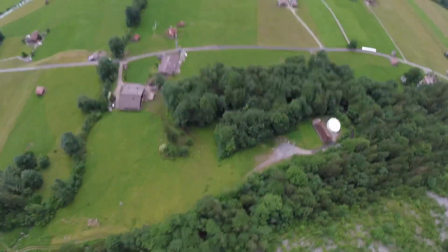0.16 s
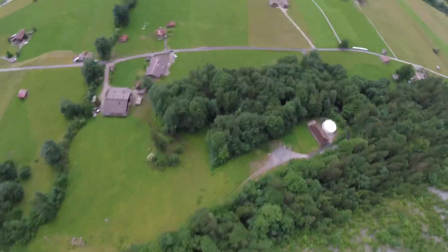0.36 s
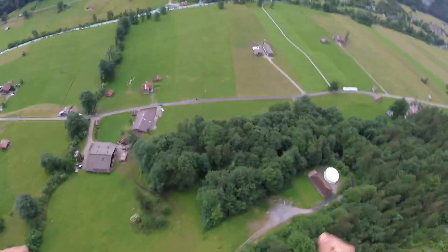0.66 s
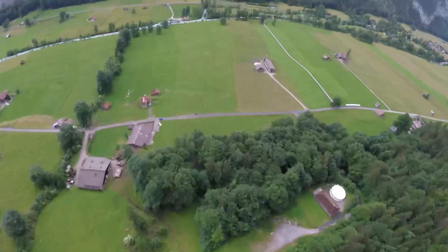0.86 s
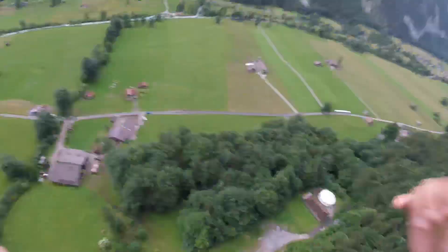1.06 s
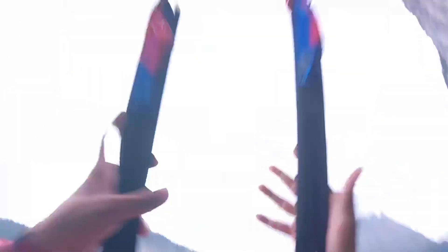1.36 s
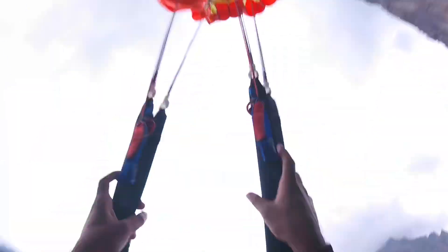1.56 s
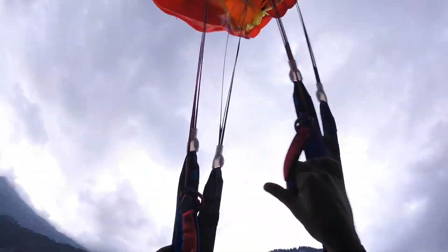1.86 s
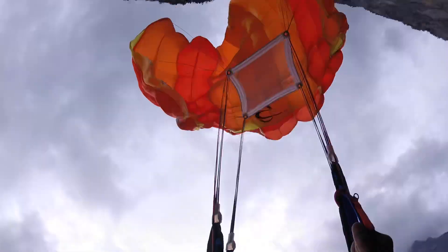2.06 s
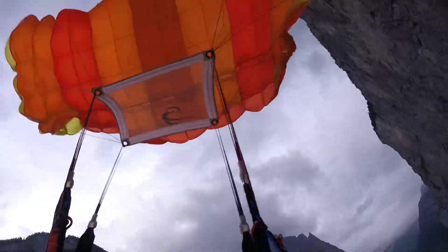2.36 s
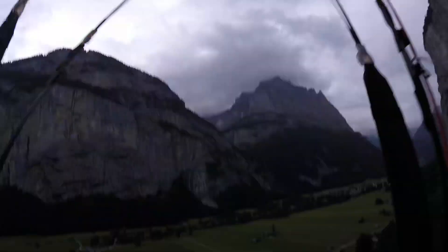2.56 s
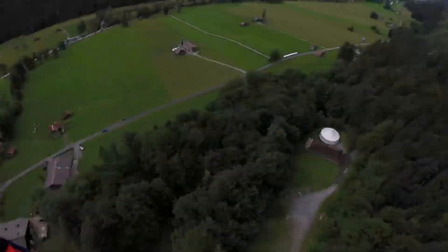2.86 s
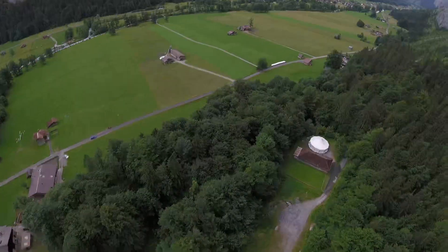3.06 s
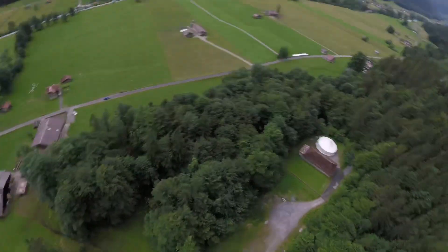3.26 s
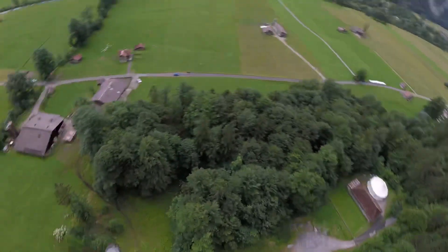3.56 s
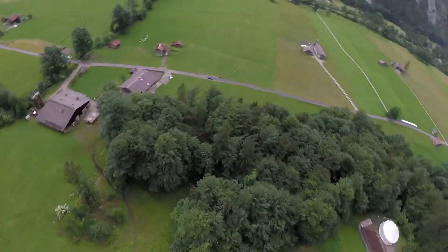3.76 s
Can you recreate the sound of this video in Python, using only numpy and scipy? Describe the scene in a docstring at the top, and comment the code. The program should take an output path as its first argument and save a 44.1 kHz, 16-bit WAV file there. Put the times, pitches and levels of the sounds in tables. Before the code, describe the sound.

Freefall wind roars until a parachute cracks open, leaving softer buffeting and flapping cloth.

```python
"""Air roars over the case of a helmet camera in free fall: turbulent buffet, rush and hiss.
The parachute deploys with a fluttering hum and swings the head out of the stream; low buffeting remains.
Cloth and lines snap and rustle as bursts of noise; a buckle rattles in short damped rings.
Then the wind of the glide builds up. The case colours all of it."""
import sys
import numpy as np
from scipy import signal
from scipy.fft import rfft, irfft, next_fast_len
from scipy.io import wavfile
from scipy.ndimage import uniform_filter1d

SR = 44100
rng = np.random.default_rng(int(sys.argv[2]) if len(sys.argv) > 2 else 0)


def master(y):
    """Save y as 16-bit WAV."""
    cut = np.clip(np.atleast_2d(y).T, -1, 1)
    pcm = np.round(cut * 32767)  # scale
    wavfile.write(sys.argv[1], SR, pcm.astype(np.int16))


N = 172431

# cloth drags (start [s], length [s], low band [dB], high band [dB])
CLOTH_DRAGS = [(1.201, 0.14, -45.5, -73), (1.723, 0.079, -59, -48), (1.834, 0.18, -45, -62),
               (2.055, 0.137, -45.5, -73), (2.067, 0.027, -56, -49), (2.197, 0.098, -43.5, -56),
               (2.292, 0.11, -47, -40.5), (2.35, 0.103, -42.5, -66), (2.572, 0.1, -54, -56),
               (3.283, .02, -54, -49), (3.42, 0.033, -49, -50), (3.613, .025, -52, -51.5),
               (3.855, 0.024, -53, -51)]
# hardware strikes (time [s], lowest mode [Hz], level [dB], t60 [s], upper modes [dB])
BUCKLE_HITS = [(0.968, 1545, -8.5, .03, -13), (1.152, 1850, -33, .05, -4), (1.212, 1740, -34, .05, -1),
               (1.238, 1750, -24.5, .045, -3), (1.292, 1786, -28.5, .05, -3), (2.158, 746, -33, 0.1, -20),
               (2.63, 850, -31, .08, -16), (2.665, 855, -28, 0.056, -18)]
# upper hardware modes (ratio to lowest [1], level [dB])
BUCKLE_MODES = [(1.52, -5), (1.93, -13), (2.4, -11)]
# flutter of the deploying rig (time [s], level [dB])
HUM_LEVEL = [(0, -53), (.55, -34), (.7, -14), (.86, -9.5), (.92, -20.5), (1.04, -13), (1.09, -17.5),
             (1.12, -30), (3.9, -64)]
# crack, body, sizzle and thump bands (low edge [Hz], high edge [Hz])
SNAP_BANDS_HZ = [(1100, 4800), (340, 1100), (4800, 14000), (100, 340)]
# ticks of lines and stiff cloth (time [s], crack [dB], body [dB], sizzle [dB])
LINE_TICKS = [(0.8563, -8, -13, -15), (1.0019, -25, -32, -23), (1.0391, -16, -31, -40),
              (1.073, -21, -24, -60), (1.082, -37, -16.5, -60), (1.152, -47, -36, -53),
              (1.273, -44, -31, -46), (1.2962, -43, -49, -45), (1.312, -41, -29, -48),
              (1.373, -48, -31, -60), (1.830, -31, -31.5, -52), (1.8891, -31, -49, -44),
              (1.9016, -20, -24, -38), (1.929, -23, -37, -33), (1.950, -24, -42, -26),
              (1.9606, -17, -25.5, -36), (1.987, -40, -36, -52), (2.035, -46, -36, -58),
              (2.0522, -26, -38, -37), (2.105, -31, -39, -58), (2.555, -22, -28, -52),
              (2.6062, -19, -34, -30), (2.712, -33.5, -50, -58)]
# cloth flaps (peak time [s], crack [dB], body [dB], sizzle [dB], thump [dB], half length [s])
CLOTH_FLAPS = [(0.966, -32, -15.5, -27, -14, 0.0036), (1.060, -11, -11, -59, -13.5, 0.013),
               (1.155, -44, -49, -61, -23, 0.013), (1.217, -59, -39, -60, -17.5, 0.0096),
               (1.236, -46, -37, -67, -18.5, 0.0042), (1.269, -44, -24, -56, -15, 0.0093),
               (1.312, -41, -26, -45, -12, 0.0054), (1.346, -60, -31, -46, -21, 0.0074),
               (1.374, -45, -31.5, -58, -20, 0.0034), (1.861, -54, -37, -52, -18, 0.004),
               (1.877, -56, -40, -58, -32, 0.0036), (1.901, -30, -39, -51, -13, 0.0056),
               (1.928, -23, -31, -48, -6.5, 0.0047), (1.947, -16, -20.5, -38, -10, 0.0092),
               (1.989, -48, -43, -60, -23, .009), (2.054, -19, -30, -40, -18, 0.0093),
               (2.112, -46, -38, -65, -22.5, 0.019), (2.244, -45, -43, -63, -28, 0.019),
               (2.324, -29.5, -28, -35.5, -19.5, 0.01), (2.446, -47, -31.5, -55, -42, 0.013),
               (2.473, -55, -37, -56, -49, 0.0066), (2.561, -34, -18.5, -60, -15.5, 0.017),
               (2.602, -46, -25, -62, -27, 0.017)]
# buffeting of the case (time [s], level [dB])
BUFFET_LEVEL = [(0.0, -11), (0.05, -15.5), (0.62, -9.5), (0.85, -15), (1.09, -9), (1.16, -26.5),
                (1.27, -10), (1.52, -21.5), (1.54, -30), (1.59, -18), (1.85, -20), (1.94, -6.5),
                (1.99, -19.5), (2.07, -9.5), (2.2, -31), (2.25, -14), (2.29, -26), (2.32, -10.5),
                (2.4, -25), (2.47, -13.5), (2.51, -22.5), (2.56, -5), (2.6, -24), (2.65, -16),
                (2.68, -23.5), (3.16, -15), (3.17, -21.5), (3.39, -18.5), (3.4, -16), (3.74, -22),
                (3.8, -18), (3.9, -17)]
# upper edge of the buffeting (time [s], knee [Hz])
BUFFET_KNEE = [(0, 150), (.55, 145), (.72, 167), (1.08, 168), (1.15, 89.5), (1.27, 144), (1.45, 62.3),
               (1.75, 72), (1.95, 140), (2.2, 94), (2.45, 100), (2.7, 95), (3.12, 116), (3.22, 74.4),
               (3.4, 118.5), (3.9, 118)]
# air rushing past the microphone (time [s], level [dB], tilt [dB/oct])
AIR_RUSH = [(0, -20, -6.5), (.3, -21.5, -8.5), (.65, -22, -6.5), (.85, -26, -6), (.92, -26.5, -8),
            (1.05, -22, -7), (1.08, -28.5, -14.5), (1.12, -46, -10.5), (1.19, -47.5, -8.5),
            (1.23, -37.5, -16.5), (1.36, -38.5, -12.5), (1.41, -51, -10), (1.75, -49, -15),
            (1.9, -46.5, -17), (1.99, -36.5, -11), (2.03, -52.5, -4), (2.17, -51.5, -13), (2.4, -42, -6),
            (2.51, -43, -7), (2.58, -34.5, -9.5), (2.69, -52.5, -4), (2.9, -46.5, -6.5), (3.26, -40.5, -9),
            (3.33, -37, -10.5), (3.45, -34.5, -11.5), (3.7, -38, -10), (3.78, -40.5, -8.5),
            (3.9, -38.5, -7.5)]
# airflow hiss (time [s], level [dB], tilt [dB/oct])
AIR_HISS = [(0, -17.5, 2), (.3, -21, -1.5), (.65, -27.5, 4.5), (.85, -25, 9), (.93, -28.5, 21),
            (.97, -22.5, -3), (1.03, -30.5, 10), (1.05, -33, 2), (1.075, -68, 6), (1.15, -67, 17),
            (1.3, -55, 15), (1.45, -58, 0.5), (1.8, -49, -6.5), (2.0, -56, -3), (2.17, -62, 7),
            (2.5, -68, 8), (3.1, -59.5, 5), (3.4, -50, -11.5), (3.65, -59.5, 8), (3.9, -55.5, 6)]
# case response (frequency [Hz], gain [dB])
CASE_RESPONSE = [(2000, 0), (3300, -4.5), (4100, -7.5), (4700, -8.5), (5400, 1.5), (6300, 2.5),
                 (7700, -2.5), (10400, -17.5), (14900, -39.5)]


def undb(db):
    """dB to gain."""
    return 10 ** (np.asarray(db) / 20)


def unit(x):
    """Scale to rms 1."""
    return x / np.sqrt(np.mean(x ** 2))


def curve(t, table):
    """Columns of a time table, linearly interpolated."""
    table = np.array(table)
    return [np.interp(t, table[:, 0], column) for column in table.T[1:]]


def walk(rate_hz):
    """Random held levels, smoothed twice; rms 1."""
    hold = int(SR / rate_hz)
    steps = np.repeat(rng.standard_normal(N // hold + 1), hold)
    return unit(uniform_filter1d(uniform_filter1d(steps, hold), hold)[:N])


def band(x, low_hz, high_hz):
    """Band-pass that keeps white noise at its rms."""
    sos = signal.butter(3, [low_hz, high_hz], "bandpass", fs=SR, output="sos")
    return signal.sosfilt(sos, x) * np.sqrt(SR / 2 / (high_hz - low_hz))


def grit(rate_hz, spread_db):
    """White noise in grains of uneven level; rms 1."""
    return unit(rng.standard_normal(N) * undb(spread_db * walk(rate_hz)))


def decay(x, tau_s):
    """Exponential tail on each impulse."""
    return signal.lfilter([1], [1, -np.exp(-1 / (tau_s * SR))], x)


def cloth_crackle(rate_hz=150):
    """Stiff cloth gives faint scattered ticks."""
    onsets = rng.random(N) < rate_hz / SR
    level_db = -58 - 2.5 * np.log(1 - rng.random(N))
    envelope = decay(onsets * undb(level_db), tau_s=.002)
    return band(envelope * rng.standard_normal(N), 1500, 13000)


def cloth_rustle(t, fade_s=.018):
    """Sliding cloth crackles densely in a low and a high band."""
    low = high = 0
    for start_s, length_s, low_db, high_db in CLOTH_DRAGS:
        inside_s = np.minimum(t - start_s, start_s + length_s - t)
        gate = np.clip(inside_s / fade_s + .5, 0, 1)
        low += undb(low_db) * gate
        high += undb(high_db) * gate
    return band(low * grit(160, 2.5), 900, 3300) + band(high * grit(160, 2.5), 4300, 9400)


def buckle_rattle(t, attack_s=.0042):
    """Struck hardware rings in four damped modes."""
    out = 0
    for start_s, hz, level_db, t60_s, upper_db in BUCKLE_HITS:
        age_s = np.maximum(t - start_s, 0)
        phase = 2 * np.pi * hz * age_s
        upper = sum(undb(upper_db + db) * np.sin(ratio * phase) for ratio, db in BUCKLE_MODES)
        envelope = undb(level_db - 60 * age_s / t60_s) * np.minimum(age_s / attack_s, 1)
        out += envelope * (np.sin(phase) + upper)
    return out


def rig_hum(t, centre_hz=185, width_hz=102):
    """The deploying rig flutters: narrow-band turbulence."""
    level_db, = curve(t, HUM_LEVEL)
    return undb(level_db) * band(grit(30.84, 3.5), centre_hz - width_hz / 2, centre_hz + width_hz / 2)


def rig_snaps(t, tick_s=.0016, fray_rate_hz=590, fray_s=.0031, fray_db=-7.5, crack_knee_hz=1320):
    """Cloth flaps in gritty puffs; lines and stiff cloth tick, each push fraying into smaller ones."""
    out = 0
    jagged = np.sign(rng.standard_normal(N))
    for k, (low_hz, high_hz) in enumerate(SNAP_BANDS_HZ):
        flaps, push = np.zeros(N), np.zeros(N)
        for peak_s, *levels_db, half_s in CLOTH_FLAPS:
            width_s = half_s * np.where(t < peak_s, .87, 1)  # rise faster than fall
            flaps += undb(levels_db[k]) * np.exp(-((t - peak_s) / width_s) ** 2)
        if k < 3:  # ticks have no thump
            for time_s, *levels_db in LINE_TICKS:
                push[int(time_s * SR)] += undb(levels_db[k])
        frays = (rng.random(N) < fray_rate_hz / SR) * rng.standard_normal(N)
        push += undb(fray_db) * decay(push, fray_s) * frays
        ticks = np.sqrt(2 * tick_s * SR) * push + decay(push, tick_s) * jagged
        snap = band(flaps * grit(700, 3) + ticks, low_hz, high_hz)
        if k == 0:  # duller crack
            snap = signal.lfilter(*signal.butter(1, crack_knee_hz, fs=SR), snap)
        out += snap
    return out


def rolloff_db(ratio, db_per_oct):
    """Loss that sets in as a frequency ratio passes 1."""
    return db_per_oct * np.log2(1 + ratio ** 4) / 4


def wind(t, buffet_low_hz=16, rush_knee_hz=232, hiss_low_hz=2500, opens_s=.76):
    """Turbulence over the case, in half-octave bands: gusting buffet and rush, steadier hiss."""
    buffet_level_db, = curve(t, BUFFET_LEVEL)
    knee_hz, = curve(t, BUFFET_KNEE)
    rush_level_db, rush_db_oct = curve(t, AIR_RUSH)
    hiss_level_db, hiss_db_oct = curve(t, AIR_HISS)
    size = next_fast_len(N)
    spectrum = rfft(rng.standard_normal(size))
    octaves = np.log2(np.maximum(np.arange(size // 2 + 1) * SR / size, 1))
    gust_db = -.53 * walk(4.68)
    eddy_db = 1.5 * walk(44.6)
    patches_db = [walk(12) for _ in range(6)]  # one per two octaves
    puffs_db = 1.5 * walk(25.1) * (t > opens_s)  # out of the stream the hiss turns patchy
    out = 0
    for k, octave in enumerate(np.arange(4, 14.1, .5)):
        hz = 2 ** octave
        window = np.cos(np.pi / 2 * np.clip((octaves - octave) * 2, -1, 1))
        noise = irfft(spectrum * window, size)[:N] * np.sqrt(SR / 2)
        flicker_db = 2 * walk(21.8) * min(hz / 150, 1)
        sway_db = gust_db + patches_db[k // 4] + flicker_db
        buffet_db = buffet_level_db - 10 * np.log10(knee_hz) + sway_db
        buffet_db -= rolloff_db(hz / knee_hz, 21) + rolloff_db(buffet_low_hz / hz, 12)
        rush_db = rush_level_db - 30 + sway_db + eddy_db
        rush_db += rush_db_oct * np.log2(np.hypot(hz, rush_knee_hz) / 800)
        rush_db -= 40 * np.log10(np.hypot(1, rush_knee_hz / 2 / hz))
        hiss_db = hiss_level_db - 41 + puffs_db + hiss_db_oct * np.log2(hz / 6500)
        hiss_db -= 40 * np.log10(np.hypot(1, hiss_low_hz / hz))
        out += noise * np.sqrt(undb(buffet_db) ** 2 + undb(rush_db) ** 2 + undb(hiss_db) ** 2)
    return out


def scene():
    """Wind and rig at the case, mono."""
    t = np.arange(N) / SR
    mix = wind(t) + rig_hum(t) + rig_snaps(t) + cloth_rustle(t) + cloth_crackle() + buckle_rattle(t)
    return mix[None]


def record(dry):
    """Peaks are rounded; the case dips at 4-5 kHz and rings near 6 kHz; the top is cut."""
    size, top_hz = 1024, 14700
    case_hz, case_db = np.array(CASE_RESPONSE).T
    bins_hz = np.arange(size // 2 + 1) * SR / size
    gain_db = np.interp(np.log(bins_hz + 1), np.log(case_hz), case_db)
    cepstrum = irfft(np.log(undb(gain_db)), size)
    cepstrum[1:size // 2] *= 2  # fold to minimum phase
    cepstrum[size // 2 + 1:] = 0
    impulse = irfft(np.exp(rfft(cepstrum)), size)
    coloured = signal.fftconvolve(np.tanh(dry), impulse[None])[:, :N]
    return signal.sosfilt(signal.ellip(8, .2, 70, top_hz, fs=SR, output="sos"), coloured)


dry = scene()
out = record(dry)
master(out)
```